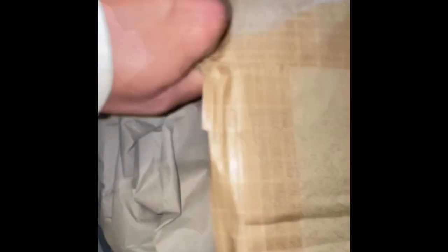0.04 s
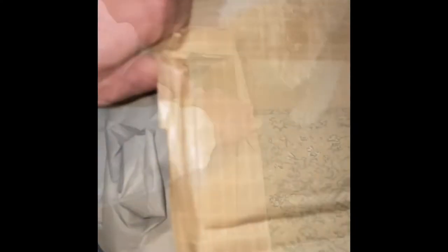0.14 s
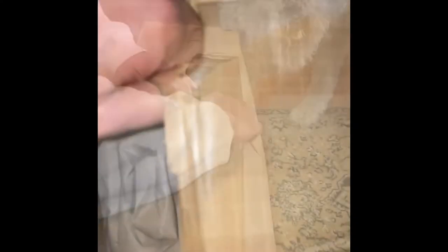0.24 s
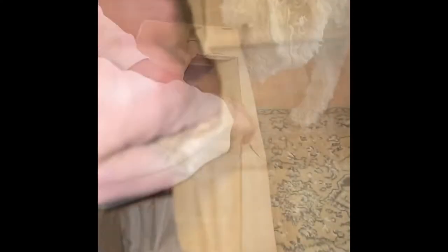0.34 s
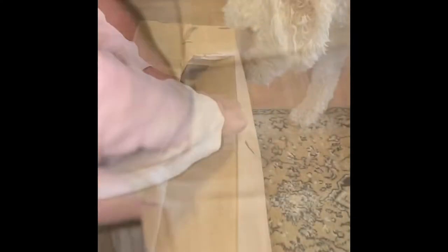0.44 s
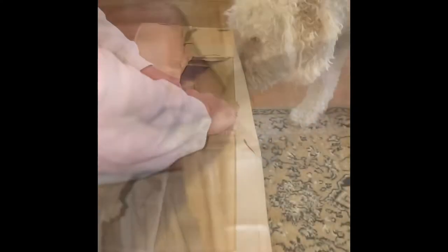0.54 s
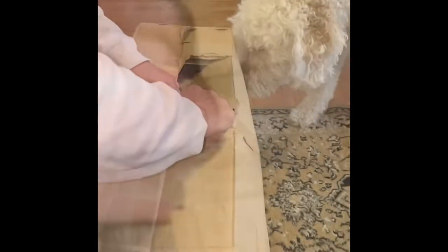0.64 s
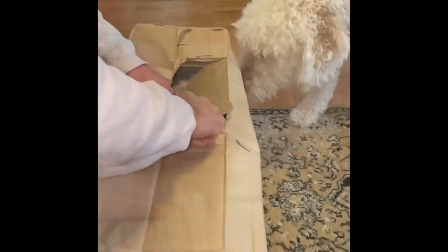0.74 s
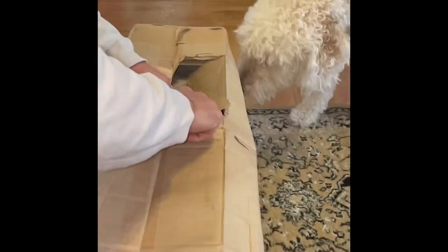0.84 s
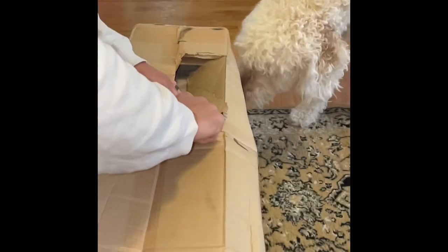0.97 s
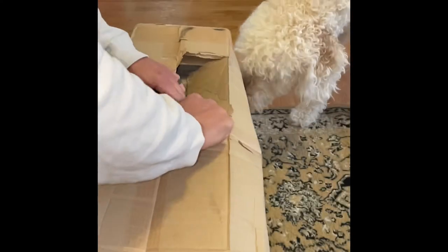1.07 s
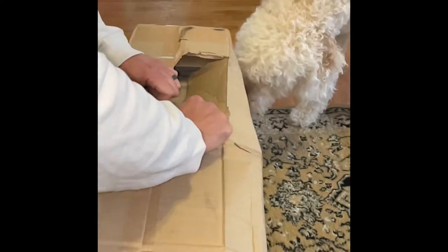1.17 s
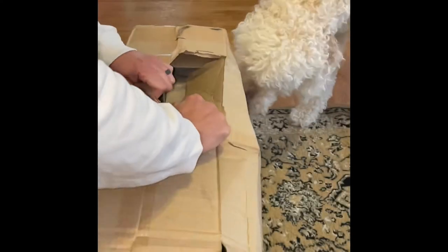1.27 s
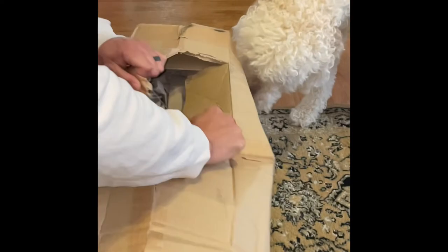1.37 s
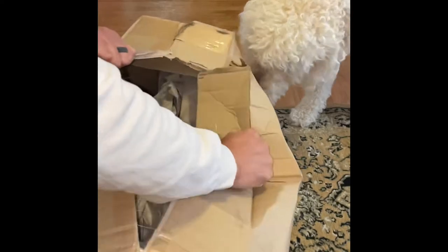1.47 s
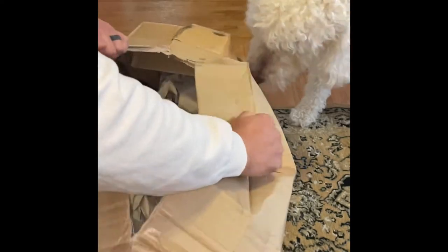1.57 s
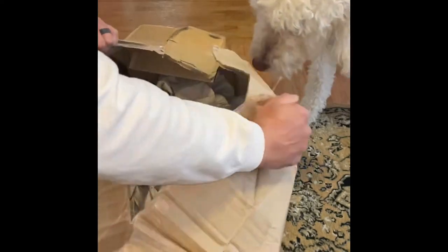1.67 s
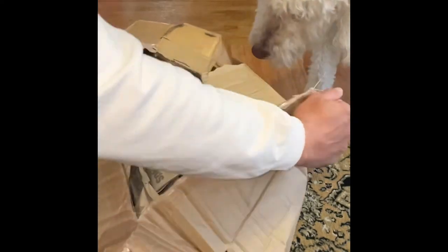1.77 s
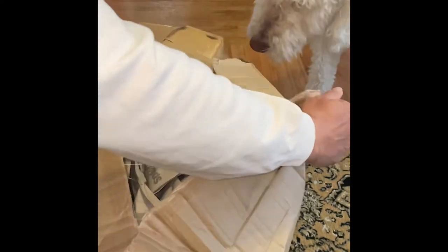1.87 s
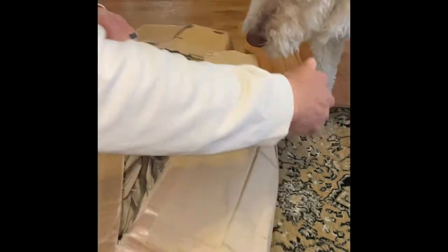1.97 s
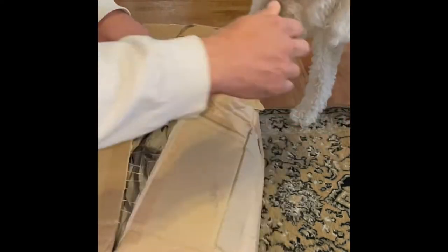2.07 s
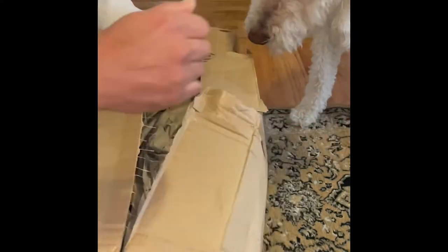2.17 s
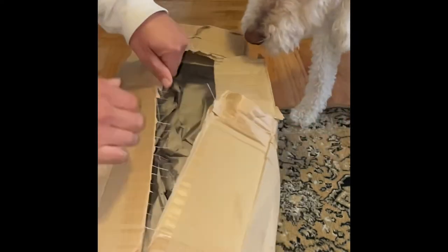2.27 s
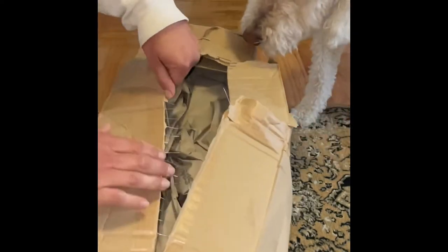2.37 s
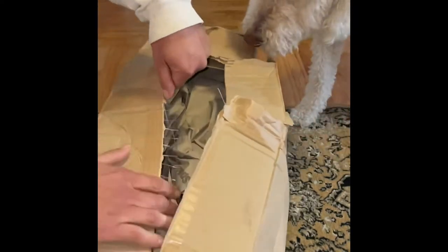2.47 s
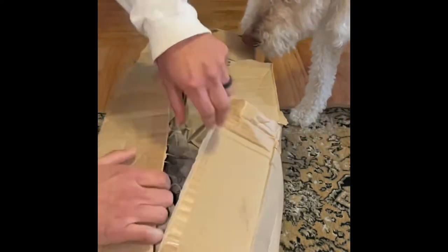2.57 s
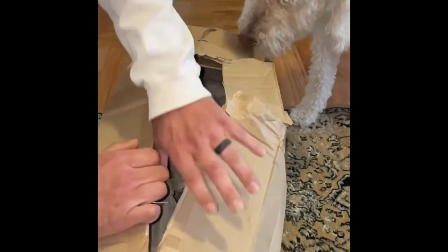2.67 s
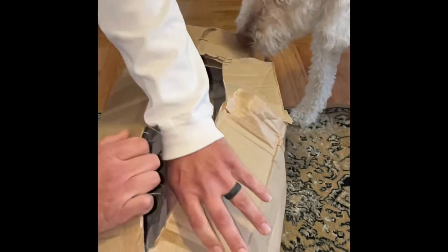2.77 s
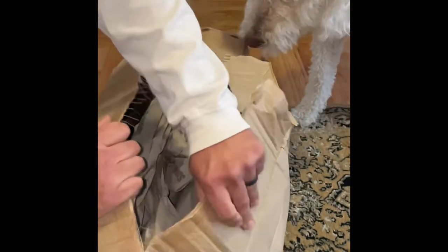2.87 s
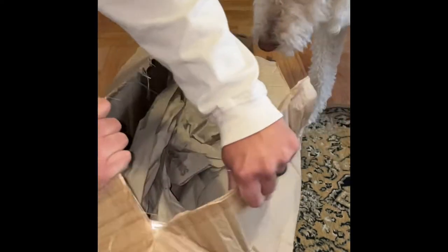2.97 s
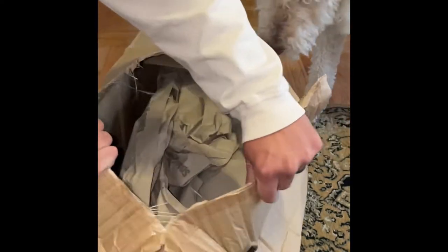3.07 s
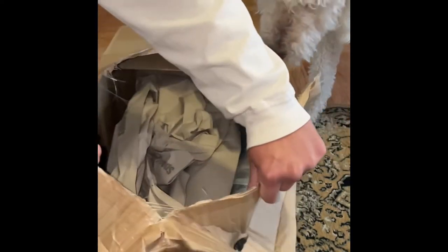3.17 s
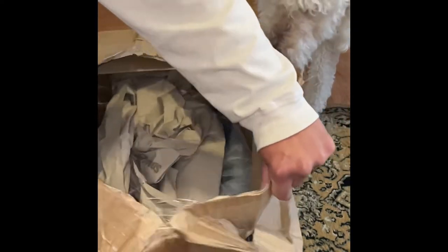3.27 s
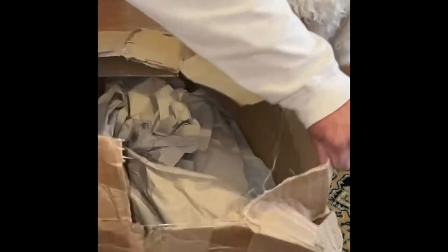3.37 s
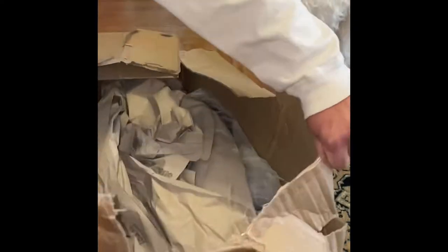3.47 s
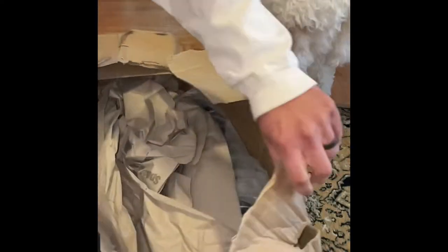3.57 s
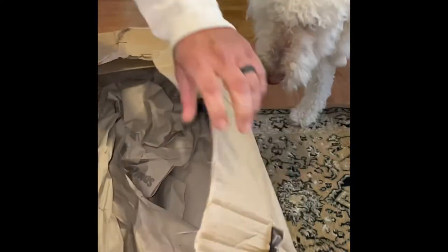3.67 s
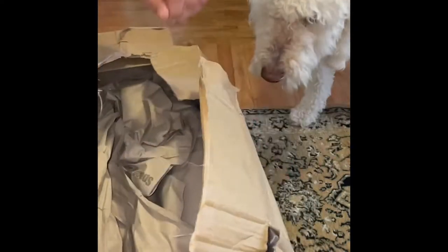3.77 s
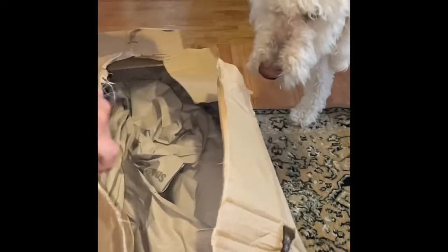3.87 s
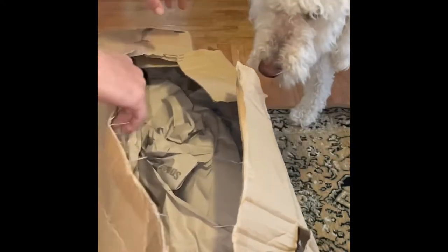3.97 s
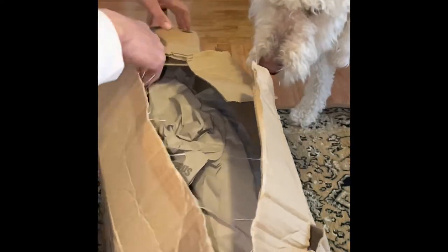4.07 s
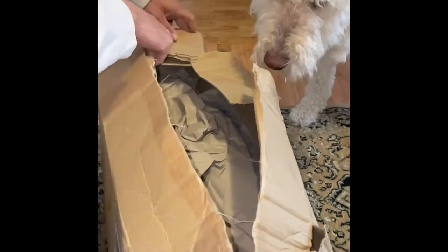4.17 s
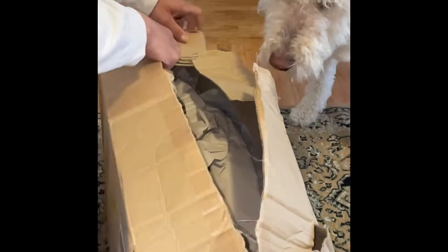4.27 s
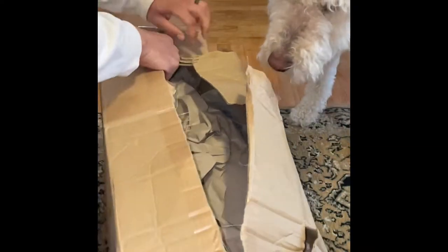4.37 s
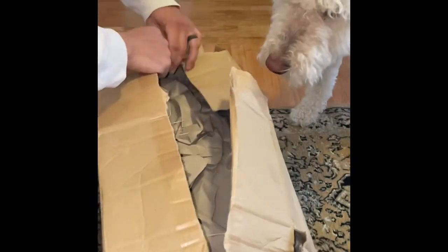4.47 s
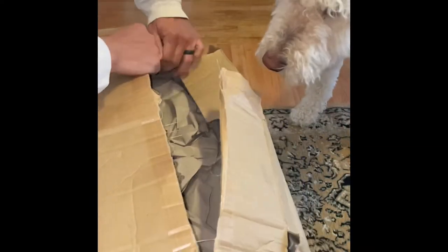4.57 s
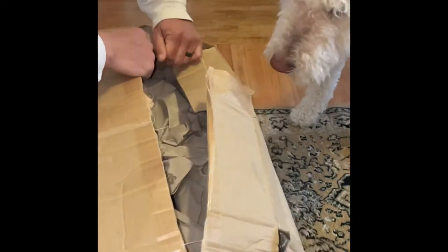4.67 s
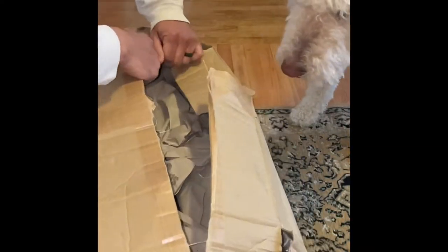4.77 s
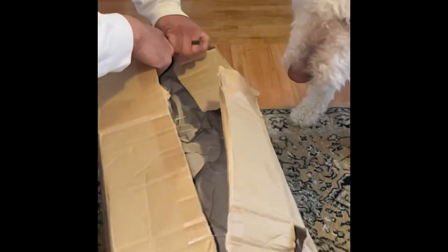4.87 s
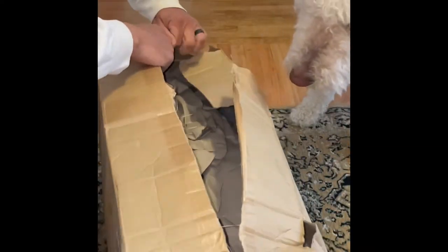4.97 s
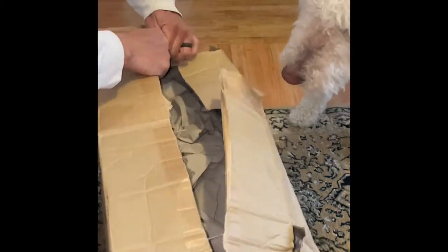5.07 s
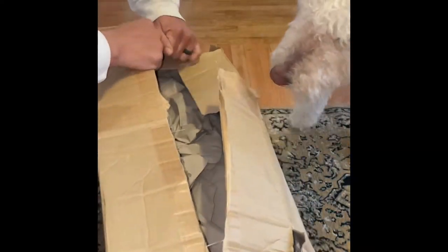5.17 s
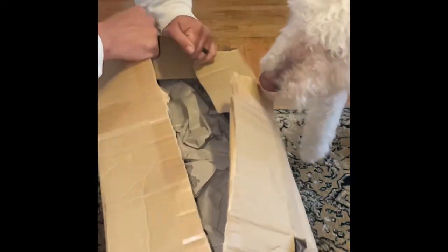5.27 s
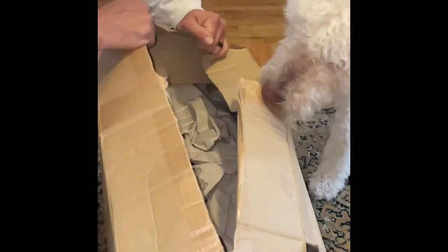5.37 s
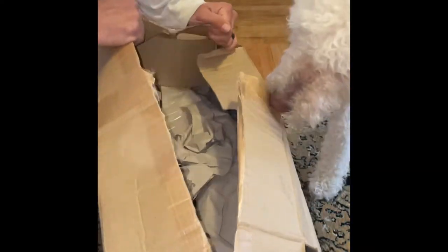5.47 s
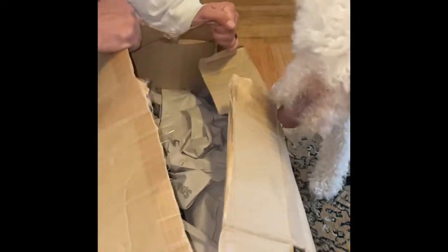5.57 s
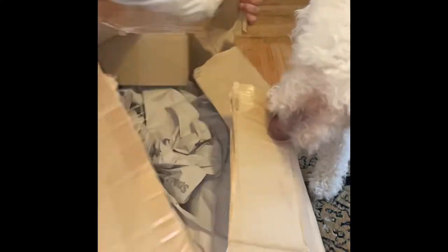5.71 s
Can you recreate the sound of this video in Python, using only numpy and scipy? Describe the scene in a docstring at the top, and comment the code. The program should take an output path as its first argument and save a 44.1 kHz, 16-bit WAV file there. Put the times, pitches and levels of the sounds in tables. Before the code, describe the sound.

Very close to the microphone, hands pull at a cardboard box in a carpeted room. Soft crackle and thin tape ticks come first, then a hard ripping burst with hollow thuds, a quiet rustling lull, another violent tear, more faint fumbling, and finally loud knocks and cracks at the end. Short room ring, low hush, stereo.

```python
"""A carpeted room: hands tear a cardboard box open, close to a phone with two microphone ports.
Fibres, tape and paper let go in dense small slips and in single loud cracks. Slips and cracks are shaped noise
that crackles in the air; slips and knocks also drive the damped modes of the hollow box, which booms shortly.
Decaying noise tails make the room ring after them, and the phase between the ports turns through the treble."""
import sys
import numpy as np
from scipy import signal
from scipy.fft import rfft, irfft, next_fast_len
from scipy.io import wavfile
from scipy.ndimage import uniform_filter1d

SR = 44100
rng = np.random.default_rng(int(sys.argv[2]) if len(sys.argv) > 2 else 0)


def unload_wav(signal):
    """Save mono or channel-first audio to the path in sys.argv[1] as 16-bit WAV at rate SR, clipped to [-1, 1]."""
    wavfile.write(
        sys.argv[1],
        SR,
        np.round(np.clip(np.atleast_2d(signal).T, -1, 1) * 32767).astype(np.int16),
    )


N = 253134

# modes of the box panels and cavity: pitch_hz, relative level_db, t60_s
BOX_MODES = [(162.5, -8.5, 0.16), (222, -5.5, 0.1), (276, -2.5, 0.047), (294, 3.5, 0.051), (336, 1, 0.036),
             (390, -1, 0.048), (450, 3.5, 0.081), (475, 7.5, 0.066), (528.4, 6, 0.079), (575.5, 6, 0.048),
             (619, -2, 0.076), (675, 0, 0.037), (742, -12.5, 0.047), (855, -27, 0.027),
             (1022, -11.5, 0.028)]
# colour of the crackle: frequency_hz, relative level_db (per Hz)
CRACKLE_COLOUR = [(300, -5), (800, -1.5), (1120, 3), (1400, -2.5), (2120, -0.5), (2500, -4), (3600, -4.5),
                  (4800, -9.5), (5500, -5), (7000, -7.5), (9000, -13), (12000, -28)]
# colour of the finest crackle: frequency_hz, relative level_db (per Hz)
FINE_COLOUR = [(6000, -44.5), (8500, -1.5), (11000, 3), (13500, -0.5), (15500, -4.5), (17000, -16)]
# treble of the crackle: time_s, finest_re_crackle_db, upper_re_lower_crackle_db
FINENESS = [(0, -12, -3), (.45, -9.5, -1), (.65, -15.5, -3), (1.05, -11.5, 3.5), (1.4, -20.5, -1),
            (2.0, -19, 0), (2.4, -22, -5.5), (2.9, -18.5, -2), (3.3, -21, -1), (3.7, -24, -3),
            (3.95, -15, 1.5), (4.3, -17, -1), (4.42, -13.5, -2.5), (4.7, -20, 4), (5.15, -11.5, 2.5),
            (5.5, -16.5, 3), (5.74, -12, 4.5)]
SPLIT_HZ = 4970  # between lower and upper crackle


def undb(db):
    """dB to gain."""
    return 10 ** (np.asarray(db) / 20)


def unit(x):
    """Scale to rms 1."""
    return x / np.sqrt(np.mean(x ** 2))


def on_log(hz, table, column=1):
    """A table column read on a log-frequency axis."""
    table = np.array(table)
    return np.interp(np.log(np.maximum(hz, 1)), np.log(table[:, 0]), table[:, column])


def in_time(table, column=1):
    """A table column read along the clock."""
    table = np.array(table)
    return np.interp(np.arange(N) / SR, table[:, 0], table[:, column])


def walk(per_s):
    """Random levels, per_s new ones each second, joined by straight slopes."""
    k = int(SR / per_s)
    held = np.repeat(rng.standard_normal(N // k + 1), k)
    return 0.74 * uniform_filter1d(held, k)[:N]


def add(track, s, sound):
    """Mix a sound in at its time."""
    i = int(s * SR)
    track[i:i + len(sound)] += sound[:N - i]


def colour(x, table):
    """Causal filter with the table's spectrum, made from the cepstrum; white noise keeps its level."""
    size = 2048
    cepstrum = irfft(on_log(np.fft.rfftfreq(size, 1 / SR), table) * np.log(10) / 20)
    # folding onto positive times makes the filter minimum phase
    cepstrum[1:size // 2] *= 2
    cepstrum[size // 2 + 1:] = 0
    h = irfft(np.exp(rfft(cepstrum)))
    return signal.oaconvolve(x, h / np.sqrt(np.sum(h ** 2)))[:len(x)]


def hush():
    """Room hush: steady coloured noise under everything."""
    # colour of the hush: frequency_hz, relative level_db (per Hz)
    quiet = [(25, -32), (60, 3.5), (540, 4), (1320, -11.5), (2170, -11), (6900, -17.5), (16000, -31)]
    quiet_db = -54
    return undb(quiet_db) * unit(colour(rng.standard_normal(N), quiet))


def room(x, t60_s, dull, count=7):
    """Decaying noise tails of unit energy; the sound starts from ever new places, each with its own paths."""
    t = np.arange(int(.6 * SR)) / SR
    tails = signal.lfilter([1], [1, -dull], rng.standard_normal((count, len(t))))
    tails = tails * undb(-60 * t / t60_s) * np.minimum(t / 0.00064, 1)
    # how much of the sound each place sends, wandering with time
    share = np.array([undb(12.9 * walk(11)) for _ in tails])
    share = share / np.sqrt(np.sum(share ** 2, axis=0))
    return sum(signal.oaconvolve(x * g, h / np.sqrt(np.sum(h ** 2)))[:N] for g, h in zip(share, tails))


def two_ports(common):
    """Each port hears the common sound with its own phase and level; near reflections reach them in opposite phase."""
    # ports: frequency_hz, left_lead_rad, left_minus_right_db, reflections_re_common_db
    port_table = [(60, 0, 0, -27), (200, .1, -1, -25), (500, .15, -3, -15), (1100, .35, -1.5, -5),
                  (2400, .3, 0, -7), (3800, .8, -.5, -6), (4500, 1.1, 0, -1.5), (5200, 0, 0, -6),
                  (6550, 1.05, 0, -6), (7900, 2.2, -.5, -7), (9000, 2.85, 0, -11), (10000, 3.14, 0, -30),
                  (11200, 3.2, 0, -26), (12050, 3.75, 0, -7), (13400, 5.25, 0, -9), (14100, 6.05, 0, -13),
                  (15500, 6.28, 0, -22)]
    near_t60_s = 0.098
    apart = room(common, near_t60_s, 0)
    size = next_fast_len(N + 4096)
    hz = np.fft.rfftfreq(size, 1 / SR)
    lead, balance_db, apart_db = (on_log(hz, port_table, column=k) for k in range(1, 4))
    side = np.array([[1], [-1]])  # left, right
    ports = undb(side * balance_db / 2) * np.exp(.5j * side * lead)
    heard = rfft(common, size) + side * undb(apart_db) * rfft(apart, size)
    return irfft(ports * heard, size)[:, :N]


def ring(x, modes, shift_db, tilt_db=0):
    """Damped modes; the grip moves, so each mode is driven more or less as time goes."""
    pivot_hz = 413  # tilt_db is per octave around this pitch
    t = np.arange(SR // 4) / SR
    shapes = [undb(db - 60 * t / t60) * np.sin(2 * np.pi * f * t) for f, db, t60 in modes]
    energy = sum(np.sum(h ** 2) for h in shapes)
    out = 0
    for h, (f, _, _) in zip(shapes, modes):
        drive_db = shift_db * walk(9) + tilt_db * np.log2(f / pivot_hz)
        out = out + signal.oaconvolve(x * undb(drive_db), h)[:N]
    return out / np.sqrt(energy)


def slips(per_s, spread_db, smear_ms, hiss_db):
    """Random slips, most tiny and a few large, each a short spray of noise, over the hiss of the finest ones."""
    chance = rng.random((int(per_s * N / SR), 2))
    level_db = np.minimum(-spread_db * np.log(chance[:, 1]), 12.5)
    power = np.zeros(N)
    np.add.at(power, (chance[:, 0] * N).astype(int), undb(level_db) ** 2)
    fall = np.exp(-1000 / (smear_ms * SR))
    power = signal.lfilter([1 - fall], [1, -fall], power)
    # level the random slips by their running mean over about a tenth of a second
    mean = uniform_filter1d(uniform_filter1d(power, SR // 14), SR // 14)
    power = power / (mean + 1e-12) + undb(hiss_db) ** 2
    return unit(np.sqrt(power) * rng.standard_normal(N))


def pulls(level_db, rows, fade_db_per_s):
    """Each pull sets in fast, holds, then fades; powers add to the steady level."""
    attack_s, swell_share = 0.0053, 0.23  # longer pulls set in more slowly
    t = np.arange(SR // 2) / SR
    power = undb(level_db) ** 2
    for s, hold, db in rows:
        onset = np.minimum(t / (attack_s + swell_share * hold), 1)
        fade = undb(db - fade_db_per_s * np.maximum(t - hold, 0))
        add(power, s, (onset * fade) ** 2)
    return np.sqrt(power)


def halves(x):
    """Lower crackle, and upper crackle at its level of the moment."""
    low = signal.lfilter(*signal.butter(2, SPLIT_HZ, fs=SR), x)
    return low, (x - low) * undb(in_time(FINENESS, column=2))


def patches(x):
    """Small tears differ in size, so each band has slips of its own and flares up apart from its neighbours."""
    # inner edges of the lower crackle's bands: edge_hz
    edges = [860, 1750, 3110]
    flicker_db = 4  # multiplies the random walk
    own_share = 0.71  # power share of slips that the other bands do not hear
    out = 0
    for lo, hi in zip([40] + edges, edges + [SPLIT_HZ]):
        tear = np.sqrt(1 - own_share) * x + np.sqrt(own_share) * slips(180, 22.0, 1.1, -1.2)
        band = signal.butter(2, [lo, hi], "band", fs=SR, output="sos")
        out = out + signal.sosfilt(band, tear) * undb(flicker_db * walk(110))
    return out


def rocking(knock, slow):
    """The whole box rocks and lands on the floor: slow slips drive its low modes."""
    # modes of the box on the floor: pitch_hz, relative level_db, t60_s
    floor_modes = [(46, -1, 0.088), (63.8, 8, 0.49), (80.8, 6.5, 0.28), (96, 15.5, 0.081),
                   (123, 11.5, 0.11), (158, 12, 0.055)]
    # the box rocks and lands: start_s, relative level_db
    landings = [(0.06, -23.5), (0.241, -35), (0.456, -21), (0.563, -18), (1.327, -22), (1.379, -28),
                (1.694, -9), (2.67, -23.5), (2.802, -21.5), (2.93, -38), (3.216, -8), (3.245, -23),
                (3.3, -8), (3.556, -25), (4.024, -24), (4.312, -21.5), (4.899, -18), (5.343, -21),
                (5.423, -29), (5.636, -8.5)]
    rock_db, landing_s = -17, 0.017  # steady rocking re knock; hold of a landing before it fades
    landing = pulls(np.full(N, -90.), [(s, landing_s, db) for s, db in landings], 650)
    thud = undb(rock_db) * knock + landing
    return undb(-12) * ring(thud * slow, floor_modes, 1.2)


def boom(knock, force, slow):
    """Soft board passes only the slower part of each slip on to the panels, which ring."""
    # tilt of the box tone as flaps bend and the cavity opens: time_s, tilt_db_per_octave
    tone = [(0, -8.5), (.9, -1), (1.2, 10), (1.5, 14), (1.75, 2.5), (2.2, 3.5), (2.95, -3), (3.25, 9.5),
            (3.45, 19), (4.0, 3), (4.27, 8), (4.36, 5), (4.5, -9), (4.9, 5), (5.3, 10.5), (5.55, 15),
            (5.74, -1.5)]
    soft = signal.lfilter(*signal.butter(2, 850, fs=SR), 0.72 * force + 0.72 * slow)
    return undb(-7) * ring(knock * soft, BOX_MODES, 4.7, in_time(tone))


def crackling(crackle, force):
    """Slips heard in the air; every tear has its own colour, so low and high crackle flicker apart."""
    high = halves(force)[1]
    air = patches(force) * undb(1.44 * walk(24.82)) + high * undb(2.3 * walk(70))
    fine = crackle * undb(in_time(FINENESS))
    return (undb(-5.5) * colour(crackle * air, CRACKLE_COLOUR)
            + undb(5.0) * colour(fine * force, FINE_COLOUR))


def handling():
    """The same slips crackle in the air and shake the box."""
    # hands shifting on the board between the rips: time_s, relative knock_db, crackle_re_knock_db
    grip = [(0, -38, -1.5), (.3, -41.5, 0.5), (.6, -42, -10), (.86, -47.5, -2), (1.0, -38.5, -8),
            (1.3, -35, -2.5), (1.6, -27, -7), (1.85, -31, -4), (2.0, -35.5, -9.5), (2.14, -53.5, -8),
            (2.42, -51, -9), (2.75, -47, -5.5), (2.9, -35, -2), (3.18, -36, 1.5), (3.45, -36, 1),
            (3.7, -46, -3), (3.95, -48, -1), (4.2, -46.5, -3.5), (4.5, -38.5, -15.5), (4.95, -35, -8.5),
            (5.13, -45, -2), (5.22, -29.5, -8), (5.45, -29, -5), (5.6, -36, -3), (5.74, -17, -15)]
    # rips and drags of the flaps: start_s, pull_s, relative knock_db, crackle_re_knock_db
    rips = [(0.161, 0.022, -37, -2), (0.453, 0.048, -42.5, 3), (0.539, 0.083, -36, 0.5),
            (0.695, 0.022, -40, 3.5), (0.9, 0.022, -39, -4), (1.021, 0.019, -21.5, -8),
            (1.164, 0.017, -23, 0), (1.263, 0.047, -25, -1.5), (1.314, 0.073, -10.5, -8),
            (1.402, 0.045, -14.5, -6.5), (1.69, 0.012, -21, -2.5), (1.757, 0.041, -22, -6.5),
            (2.182, 0.0071, -41, -19), (2.26, 0.012, -35, -27), (2.446, 0.079, -40, -3.5),
            (2.483, 0.1, -34.5, -12), (2.61, 0.058, -40.5, -4), (2.799, 0.029, -38.5, -4),
            (2.912, 0.051, -23, -6), (2.975, 0.085, -27, -1.5), (3.208, 0.0093, -25.5, 4.5),
            (3.245, 0.068, -17, -2.5), (3.367, 0.02, -27, -2.5), (3.528, 0.064, -40, 6),
            (4.011, 0.034, -35, -14), (4.19, 0.055, -46, -3.5), (4.234, 0.11, -33.5, -10),
            (4.45, 0.14, -35.5, -6), (4.601, 0.041, -29.5, -10), (4.757, 0.055, -40, 3),
            (4.867, 0.025, -31, -7.5), (5.152, 0.029, -32, 1), (5.263, 0.076, -32, -3.5),
            (5.428, 0.0048, -15, -8), (5.494, 0.024, -42, -23), (5.604, 0.071, -13.5, -7.5),
            (5.684, 0.023, -8, -7.5)]
    grip_db = in_time(grip)
    knock = pulls(grip_db, [(s, hold, db) for s, hold, db, _ in rips], fade_db_per_s=211)
    crackle = pulls(grip_db + in_time(grip, column=2),
                    [(s, hold, db + air) for s, hold, db, air in rips], fade_db_per_s=295)
    force = slips(250, 10.4, 0.71, 0.67)
    slow = slips(120, 3.7, 1.8, -2.1)
    return boom(knock, force, slow) + rocking(knock, slow) + crackling(crackle, force)


def knocks():
    """Bending waves run through a panel, high ones first: a swing whose pitch sinks, while the box rings."""
    # knocks of hands and released panels: start_s, relative level_db, pitch_hz at the strongest swing,
    # share of that pitch that the tail sinks to
    hits = [(0.065, -20.5, 338, 0.34), (0.193, -24.5, 404, 1), (0.25, -14.5, 318, 0.73),
            (0.55, -27.5, 182, 0.51), (1.032, -13, 490, 1), (1.174, -19, 330, 0.56),
            (1.285, -14.5, 477, 0.78), (1.341, -8, 333, 0.29), (1.358, -2, 346, 0.48),
            (1.369, -7.5, 283, 0.25), (1.386, -12, 497, 0.91), (1.395, -9, 255, 0.38),
            (1.423, -16, 452, 0.5), (1.436, -10.5, 460, 0.75), (1.6984, -14.5, 307, 0.4),
            (1.708, -13.5, 196, 0.47), (1.776, -19, 288, 0.53), (2.266, -35, 458, 0.9),
            (2.442, -34, 150, 0.59), (2.484, -28, 325, 0.71), (2.509, -22.5, 480, 0.82),
            (2.595, -41, 403, 0.65), (2.666, -29.5, 510, 0.79), (2.802, -31, 433, 0.66),
            (2.842, -30.5, 215, 0.52), (2.931, -12, 408, 0.62), (2.942, -21, 350, 0.48),
            (3.032, -11, 256, 0.54), (3.058, -16.5, 360, 0.47), (3.214, -4.5, 375, 0.49),
            (3.246, -4, 418, 0.29), (3.306, -2.5, 516, 0.82), (3.321, -19, 480, 0.63),
            (3.633, -30, 510, 0.63), (3.825, -39, 497, 0.94), (4.031, -35, 640, 0.99),
            (4.198, -34, 216, 0.69), (4.257, -27.5, 430, 0.42), (4.28, -29, 783, 0.83),
            (4.318, -29, 212, 0.87), (4.469, -27, 503, 0.62), (4.49, -34, 637, 0.67),
            (4.586, -24, 326, 0.73), (4.619, -21, 300, 0.67), (4.64, -23.5, 280, 0.57),
            (4.844, -33, 480, 0.69), (4.877, -36, 613, 0.92), (4.903, -23.5, 402, 0.31),
            (5.23, -30, 626, 1), (5.307, -20, 440, 1), (5.335, -16, 447, 0.97), (5.427, -4, 549, 0.79),
            (5.445, -20.5, 420, 0.46), (5.511, -17.5, 584, 0.95), (5.615, -9, 513, 0.61),
            (5.647, -10, 464, 0.7), (5.668, -10.5, 323, 0.54), (5.706, -12, 343, 0.27)]
    lag_s, swing_s, sink_s = 0.002, 0.00356, 0.0026  # first wave's delay; strongest swing; pace of sinking
    t = np.arange(SR // 12) / SR
    rise = t / swing_s
    panel, push = np.zeros((2, N))
    for s, db, hz, sink in hits:
        pitch = hz * (sink + (1 - sink) * np.exp((swing_s - t) / sink_s))
        turns = np.cumsum(pitch) / SR
        # deeper sinking lasts longer
        swell = (rise * np.exp(1 - rise)) ** (0.79 + 1.3 * sink)
        add(panel, s + lag_s, undb(db) * np.sin(2 * np.pi * turns) * swell)
        add(push, s + 0.002786, undb(db) * np.exp(-t / 0.00053))
    return undb(-1.5) * panel + undb(-14) * ring(push, BOX_MODES, 3.9)


def bursts(count, decay_ms):
    """Short sprays of splinters of unit energy: noise in random grains that dies away."""
    t = np.arange(SR // 40) / SR
    noise, luck = rng.standard_normal((count, len(t))), rng.random((count, len(t)))
    luck[:, 12:40:9] = 0  # the first splinters go together
    splinters = uniform_filter1d(1. * (luck < .03), 9, axis=1) * 2.0 + 0.23
    burst = noise * splinters * np.exp(-t * 1000 / decay_ms) * np.minimum(t / 0.00027, 1)
    return burst / np.sqrt(np.sum(burst ** 2, axis=1, keepdims=True))


def cracks():
    """Fibres snap: a spray of splinters, and a flap of board that swings a few cycles at its own pitch."""
    # single cracks: start_s, relative level_db, pitch_hz of the flap
    snaps = [(0.023, -32, 1430), (0.0657, -20, 1050), (0.191, -25.5, 940), (0.2384, -28, 1510),
             (.2503, -21.5, 1850), (.36, -29, 2130), (.435, -33, 5060), (0.4587, -25, 1770),
             (.4753, -18.5, 6200), (0.4939, -32.5, 1650), (.499, -18, 5630), (0.5214, -30, 1570),
             (0.5745, -27, 2010), (1.0041, -24, 1620), (1.0319, -35, 1740), (1.036, -13.5, 1720),
             (1.0554, -26, 3600), (1.1523, -26, 2100), (1.1705, -9, 1810), (1.176, -16, 1640),
             (1.1814, -15.5, 2950), (1.1895, -25, 2250), (1.285, -13.5, 3100), (1.3234, -13.5, 1650),
             (1.324, -14, 3600), (1.3358, -7, 3420), (1.3363, -5, 1520), (1.343, -8.5, 2280),
             (1.347, -6, 2870), (1.3551, -7.5, 2640), (1.3656, -14, 2800), (1.372, -22, 4500),
             (1.3874, -11.5, 3600), (1.3945, -15, 3400), (1.413, -17, 3470), (1.429, -27, 2200),
             (1.441, -19, 3000), (1.493, -22, 3460), (1.5857, -23, 3720), (1.6975, -8, 3700),
             (1.702, -21, 3820), (1.812, -24.5, 2920), (2.2652, -39, 1530), (2.503, -34, 1900),
             (2.5115, -26.5, 1400), (2.6735, -31, 1480), (2.803, -32.5, 2800), (2.813, -30, 6000),
             (2.882, -27.5, 2030), (2.9303, -18, 2270), (2.9318, -21.5, 5460), (2.9423, -15, 2870),
             (2.946, -14, 1310), (2.9747, -20.5, 2980), (2.9785, -17.5, 1500), (3.0017, -14, 1560),
             (3.0258, -15, 2500), (3.0319, -11.5, 1080), (3.0582, -13, 1880), (3.066, -14, 6400),
             (3.157, -23, 2190), (3.2155, -2.5, 2050), (3.2281, -22, 2370), (3.246, -1.3, 2040),
             (3.2587, -14, 2330), (3.2725, -14.5, 3600), (3.281, -22, 3500), (3.2956, -18, 1550),
             (3.302, -15, 3600), (3.3066, -7, 1490), (3.3144, -8.5, 2230), (3.33, -18, 2500),
             (3.3663, -15.5, 5200), (3.5584, -27.5, 2040), (3.8255, -29, 3300), (4.3198, -26.5, 1520),
             (4.322, -40, 5300), (4.5587, -29.5, 6560), (4.6125, -17.5, 5770), (4.6135, -21, 3000),
             (4.6145, -26.5, 1600), (4.628, -32, 1850), (4.7902, -34, 3440), (4.805, -39, 2450),
             (4.8422, -29.5, 1750), (4.8681, -29.5, 1980), (4.989, -32.5, 2100), (5.1637, -32, 3520),
             (5.1835, -29, 2060), (5.2683, -25, 2120), (5.29, -22, 2220), (5.308, -31, 4240),
             (5.349, -23, 2830), (5.3973, -19.5, 2220), (5.427, -14.5, 2330), (5.6156, -5.5, 2490),
             (5.6487, -12.5, 2130), (5.688, -20, 3000), (5.6934, -14, 2640)]
    # thin ticks of tape threads: start_s, relative level_db
    ticks = [(0.1221, -28), (0.2244, -28), (0.3436, -36), (0.4666, -9), (0.5267, -27), (0.717, -24.5),
             (0.7217, -34), (0.7597, -34), (0.855, -40)]
    # taut tape and stiff flaps ring much, torn board little: time_s, flap re spray (gain)
    ringing = [(0.5, 2), (1.0, 8), (1.29, 8), (1.33, 3), (1.39, 7), (2.7, 7), (2.9, 2), (4.5, 3), (5.74, 4)]
    snap_q, snap_rise_s = 2.2, 0.00062  # sharpness and build-up of a crack's own pitch
    fine_db, fine_db_per_db = -3, 0.06  # fine share of a crack at 0 dB; its growth with level
    air, fine = np.zeros((2, N))
    t = np.arange(SR // 40) / SR
    for (s, db, hz), burst in zip(snaps, bursts(len(snaps), decay_ms=1.87)):
        peak = signal.iirpeak(hz, snap_q, SR)
        flap = signal.lfilter(*peak, burst * (1 - np.exp(-t / snap_rise_s)))
        flap = signal.lfilter(*peak, flap)
        snap = colour(burst + np.interp(s, *zip(*ringing)) * flap, CRACKLE_COLOUR)
        add(air, s, undb(db) * snap / np.sqrt(np.sum(snap ** 2)))
        add(fine, s, undb(db + fine_db + fine_db_per_db * db) * burst)
    fine = fine * undb(in_time(FINENESS))
    for (s, db), burst in zip(ticks, bursts(len(ticks), decay_ms=.4)):
        add(fine, s, undb(db) * burst / 2)
    return undb(16.0) * sum(halves(air)) + undb(24.5) * colour(fine, FINE_COLOUR)


def scene():
    """The box in its room over the hush, as it reaches the two ports."""
    room_t60_s, room_db = 0.29, -11.5
    box = handling() + cracks() + knocks()
    common = box + undb(room_db) * room(box, room_t60_s, 0.42) + hush()
    return two_ports(common)


def record(dry):
    """The phone rounds the loudest peaks, drops the deepest bass and cuts the top."""
    top_hz = 16000
    rounded = np.tanh(0.77 * dry)
    thin = signal.sosfilt(signal.butter(3, 50, "high", fs=SR, output="sos"), rounded)
    return signal.sosfilt(signal.ellip(10, .2, 80, top_hz, fs=SR, output="sos"), thin)


dry = scene()
out = record(dry)
unload_wav(out)
```